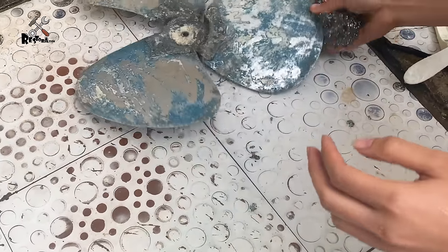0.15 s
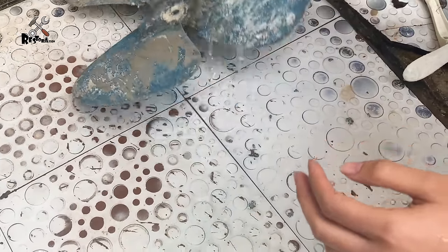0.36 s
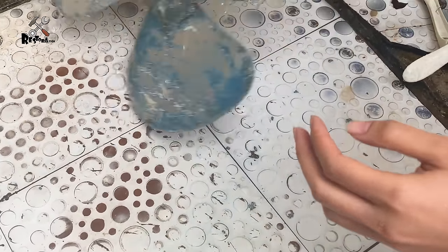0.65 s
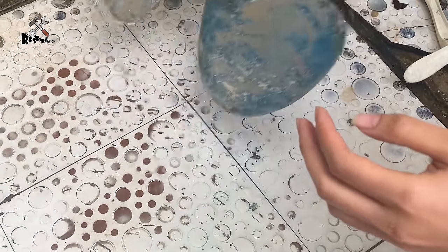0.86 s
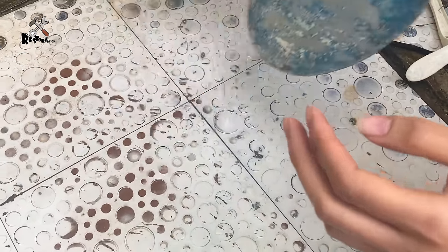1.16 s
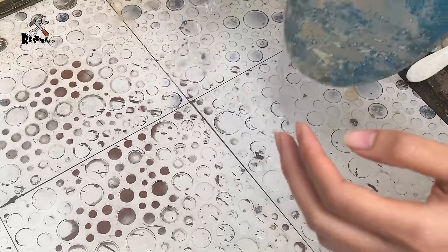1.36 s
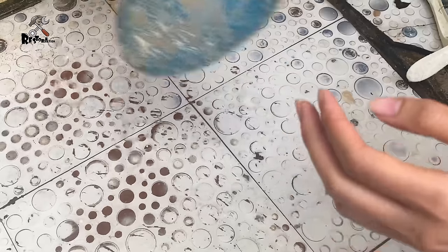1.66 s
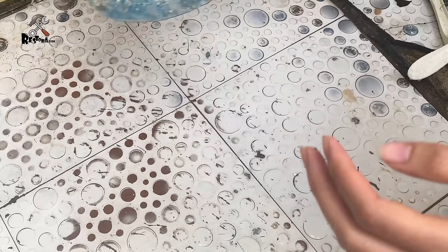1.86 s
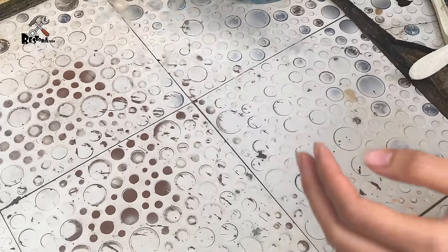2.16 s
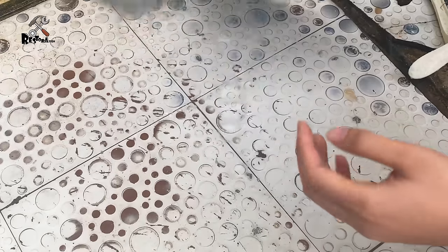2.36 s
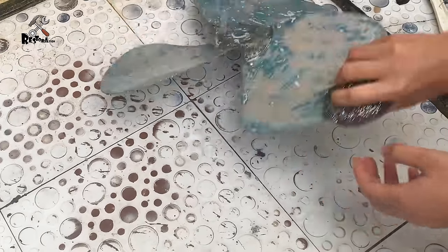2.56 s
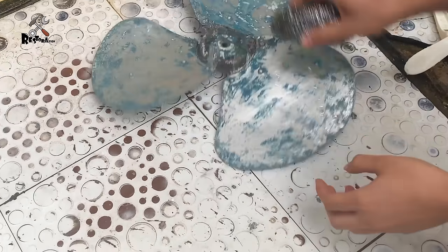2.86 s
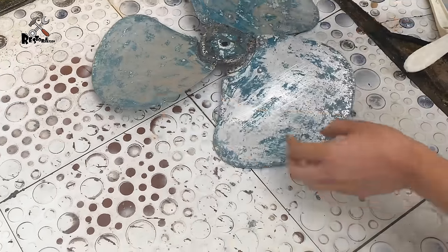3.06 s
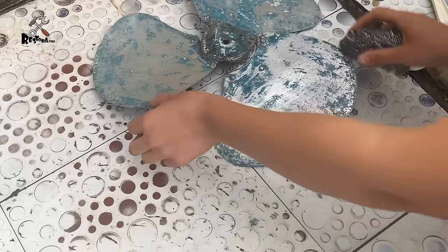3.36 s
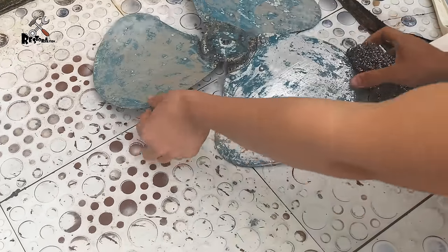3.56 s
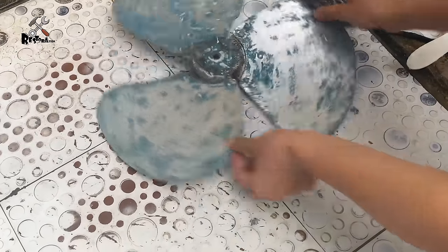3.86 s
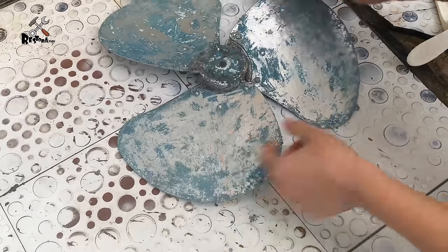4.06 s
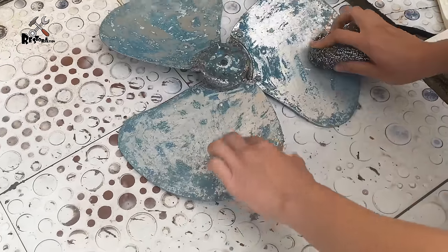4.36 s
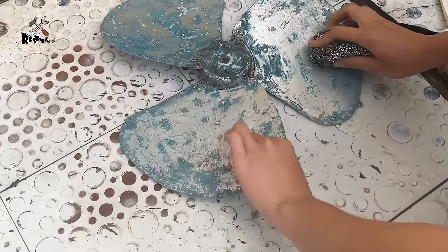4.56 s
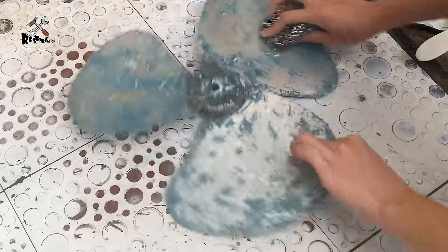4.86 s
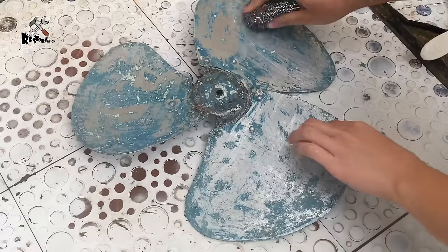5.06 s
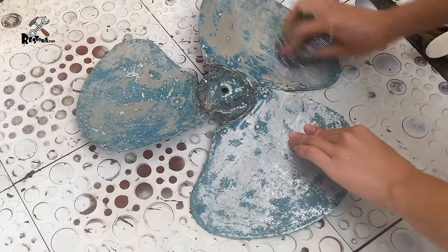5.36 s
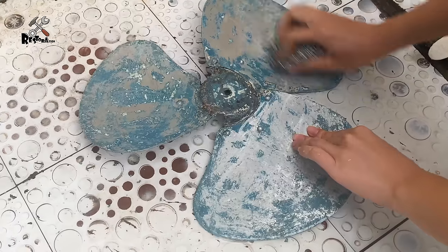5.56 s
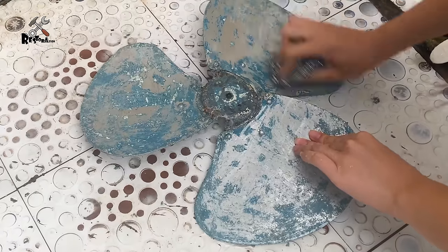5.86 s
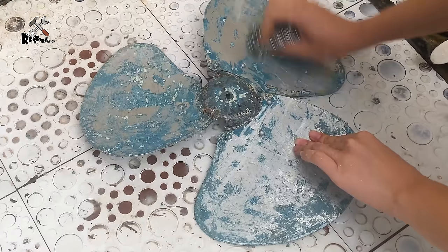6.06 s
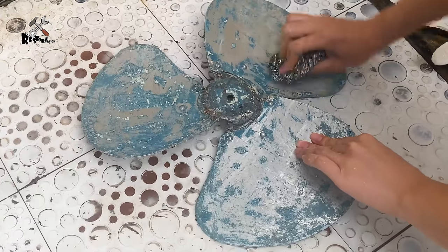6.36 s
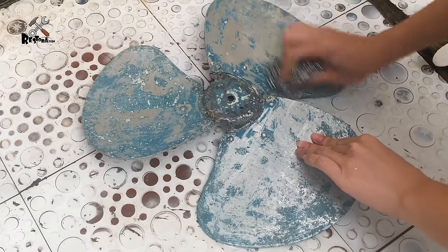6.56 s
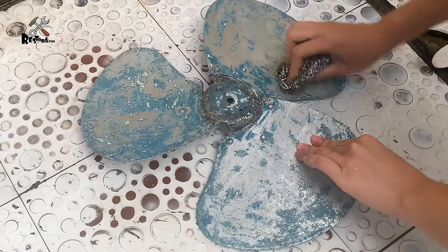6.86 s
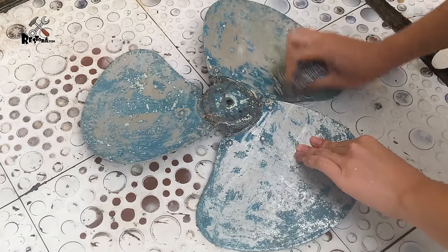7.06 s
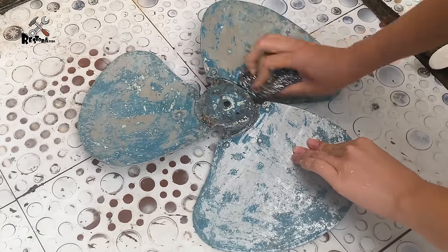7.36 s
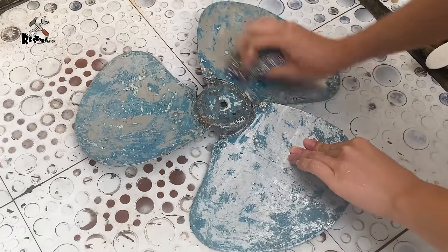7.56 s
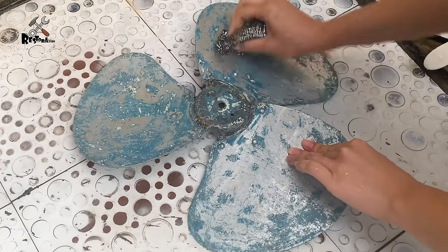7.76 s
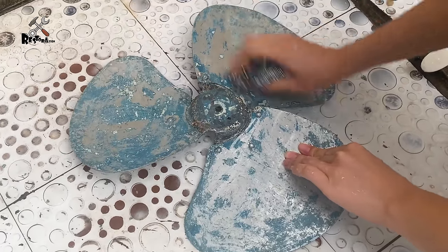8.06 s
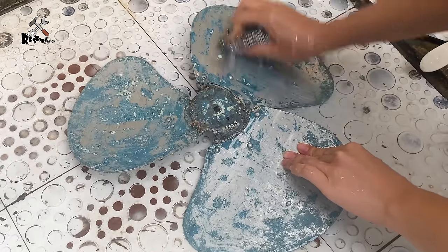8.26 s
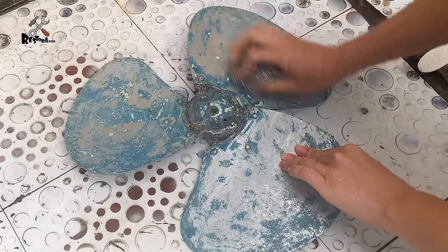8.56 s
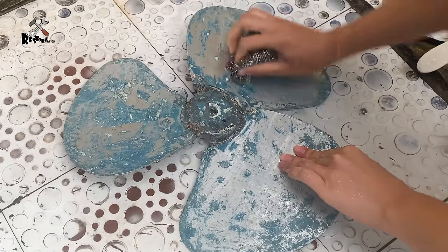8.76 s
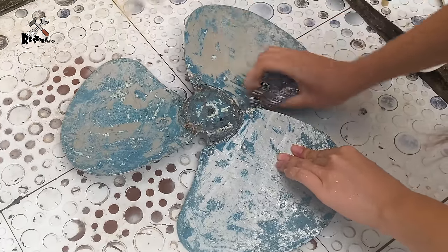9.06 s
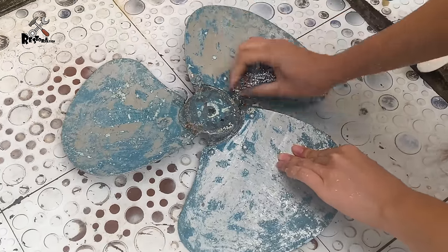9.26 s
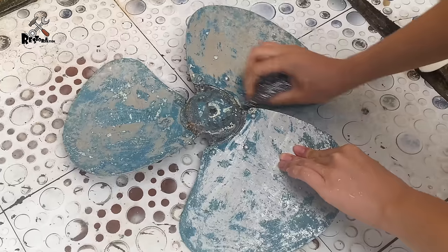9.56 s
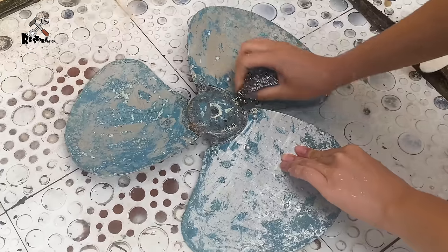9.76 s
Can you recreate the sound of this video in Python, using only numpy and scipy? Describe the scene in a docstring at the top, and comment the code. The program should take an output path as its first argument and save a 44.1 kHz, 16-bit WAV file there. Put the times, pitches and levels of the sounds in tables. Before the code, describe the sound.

Metal fan clanks and drags on a tiled floor, then wiry scouring strokes continue in a bright, fast, scratchy rhythm.

```python
"""Tiled floor: a steel-wool pad scours a three-bladed metal fan in quick to-and-fro strokes.
Filtered grains make the wires rasp; snap bursts make them snag; a broad resonance hums for the held blade.
In the first five seconds the fan knocks on the tiles and drags over them: decaying modes clang,
stick-slip grains scrape. Behind: steady air, dull rumbles, soft bumps and faint wavering tones."""
import sys
import numpy as np
from scipy import signal
from scipy.fft import rfft, irfft, next_fast_len
from scipy.io import wavfile
from scipy.ndimage import uniform_filter1d

SR = 44100
rng = np.random.default_rng(int(sys.argv[2]) if len(sys.argv) > 2 else 0)


def materialize(psi):
    """Save the field psi as 16-bit PCM at rate SR to the path in sys.argv[1].

    A 1-D psi becomes a single channel; in a 2-D psi each row is a channel.
    """
    bounded = np.clip(np.atleast_2d(psi).T, -1, 1)
    quanta = np.round(bounded * 32767).astype(np.int16)
    wavfile.write(sys.argv[1], SR, quanta)


N = 437031
TIME = np.arange(N) / SR
SIZE = next_fast_len(N + SR)
FREQS = np.arange(SIZE // 2 + 1) * SR / SIZE
SET_DOWN_S = 2.3   # fan held up before this; at most its rim touches the tiles


def from_db(db):
    """Decibels to gain."""
    return 10 ** (np.asarray(db) / 20)


def rms_one(x):
    """Scale to unit power."""
    return x / np.sqrt(np.mean(x ** 2) + 1e-20)


def level(rows):
    """Gain along (s, dB) rows, silent outside them."""
    s, db = np.transpose(rows)
    inside = (TIME >= s[0]) * (TIME <= s[-1])
    return from_db(np.interp(TIME, s, db)) * inside


def at_hz(points, hz):
    """Read a table on a log-frequency axis."""
    f, value = np.transpose(points)
    return np.interp(np.log(hz + 1), np.log(f), value)


def colour(x, spectrum):
    """Causal (minimum-phase) filter with the given (Hz, dB) spectrum."""
    size = next_fast_len(len(x) + 2048, True) // 2 * 2
    hz = np.arange(size // 2 + 1) * SR / size
    cepstrum = irfft(np.log(from_db(at_hz(spectrum, hz))))
    # fold the cepstrum onto positive time
    cepstrum[1:size // 2] *= 2
    cepstrum[size // 2 + 1:] = 0
    return irfft(rfft(x, size) * np.exp(rfft(cepstrum)))[:len(x)]


def band(x, hz, kind):
    """Butterworth filter of design order 2."""
    return signal.sosfilt(signal.butter(2, hz, kind, fs=SR, output="sos"), x)


def resonate(x, hz, width_hz):
    """One two-pole resonance, about unit gain on top."""
    r = np.exp(-np.pi * width_hz / SR)
    zeros = np.array([1, 0, -1]) * (1 - r * r) / 2
    poles = [1, -2 * r * np.cos(2 * np.pi * hz / SR), r * r]
    return signal.lfilter(zeros, poles, x + 1e-18)


def drift(per_s):
    """Random values, per_s of them a second, joined by straight lines."""
    return np.interp(TIME * per_s, np.arange(20000), rng.standard_normal(20000))


def grains(per_s, spread_db):
    """Random clicks, many small and a few large."""
    size_db = spread_db * np.minimum(rng.exponential(1, N), 5)
    sizes = from_db(size_db) * rng.choice([-1, 1], N)
    return sizes * (rng.random(N) < per_s / SR)


def steady(x, span_s):
    """Even out the slow level, keep the fine grain."""
    power = np.abs(uniform_filter1d(x ** 2, int(span_s * SR)))
    return x / np.sqrt(power + 1e-6 * np.mean(x ** 2))


def add(out, s, sound):
    """Mix a sound in at a time."""
    at = max(round(s * SR), 0)
    out[at:at + len(sound)] += sound[:N - at]


def dying(t60, count):
    """Noise that dies away, with unit energy."""
    tail = rng.standard_normal(count) * from_db(-60 * TIME[:count] / t60)
    return tail / np.sqrt(np.sum(tail ** 2))


# even-paced stroke runs, each until the next; negative stall lifts the turns:
# start_s, strokes_per_s, relative_level_db, stall_db
STROKE_RUNS = [(0.01, 8.2, -31.5, 3.5), (0.985, 6.6, -37.5, 1), (2.19, 8.0, -34, -0.5),
               (3.56, 7.9, -32.5, -1), (3.94, 7.7, -33, 4), (4.72, 4.5, -32, 2), (4.942, 10, -32.5, 2),
               (5.335, 6.8, -31.5, 3), (5.92, 8.7, -29, 7), (6.148, 8.2, -28, 4.5),
               (7.128, 7.6, -29.5, 3.5), (7.785, 8.2, -29.5, 4), (8.519, 10.2, -29, 4.5),
               (9.01, 7.8, -30.5, 4)]
STALL_SHARPNESS = 1.45   # higher: shorter halt at a turn
STROKE_SAG_DB = 0.5   # push eases from +this to -this along a stroke
STROKE_SPREAD_DB = 1.02   # stroke-to-stroke firmness


def pad_speed():
    """Rubbing gain: shaped by half-sine travel from turn to turn, whole strokes per run."""
    s, per_s, db, stall_db = np.transpose(STROKE_RUNS)
    bounds = np.append(s, TIME[-1])
    done = np.append(0, np.cumsum(np.round(per_s * np.diff(bounds))))
    stroke, part = np.divmod(np.interp(TIME, bounds, done), 1)
    travel = np.clip(np.sin(np.pi * part), 0, 1)
    run = np.maximum(np.searchsorted(s, TIME) - 1, 0)
    firmness_db = STROKE_SPREAD_DB * rng.standard_normal(200)[stroke.astype(int)]
    push_db = travel * (firmness_db + STROKE_SAG_DB * (1 - 2 * part))
    turn_db = stall_db[run] * (1 - travel) ** STALL_SHARPNESS
    return from_db(np.interp(TIME, s, db) + push_db - turn_db)


# wire rasp spectrum: freq_hz, level_db
RASP_COLOUR = [(200, -39), (600, -8), (1500, -2), (2300, -5.5), (3300, 2.5), (5000, 2), (7000, 2.5),
               (8600, 1.5), (11000, -1.5), (13000, -6), (16000, -16)]
# wires that catch and spring free at set times: time_s, relative_peak_db, pitch_hz
TIMED_SNAGS = [(0.047, -18, 11500), (0.402, -22, 4240), (0.9053, -26, 6640), (1.2396, -26.5, 9600),
               (1.436, -22.5, 4800), (1.766, -24, 4840), (2.358, -14.5, 10420), (3.191, -21, 6340),
               (3.3542, -21, 3450), (3.675, -23, 4640), (4.003, -18, 4200), (4.143, -21, 7100),
               (4.481, -19, 4430), (4.6565, -18, 9800), (5.5877, -17.5, 4900), (5.9569, -18.5, 5700),
               (6.6313, -18.5, 6000), (7.166, -18, 6100), (7.405, -23, 2950), (8.7554, -19.5, 9810),
               (9.0726, -19.5, 4900), (9.5806, -21, 5800)]


def rasp(speed):
    """Thousands of wire tips slip over the paint; each length band catches in its own clumps."""
    edges_hz = np.geomspace(1200, 17000, num=8)
    clumps = [from_db(3.44 * drift(per_s=39) + 3.84 * drift(per_s=200)) for edge in edges_hz[1:]]
    clumps[-1] = clumps[-1] * (speed / from_db(-45.0)) ** 0.45   # faster pad: brighter
    grip = from_db(0.47 * drift(per_s=120))
    catches = np.clip(grains(per_s=240, spread_db=3.4), -4.5, 4.5)

    def radiate():
        """Same clumps and catches, fresh fine detail for one draw."""
        wires = band(grains(per_s=10000, spread_db=2.0), edges_hz[0], "low")
        for low, high, clump in zip(edges_hz, edges_hz[1:], clumps):
            wires += clump * band(grains(per_s=14000, spread_db=3.5), [low, high], "band")
        crackle = rms_one(signal.oaconvolve(catches, dying(0.0011, count=SR // 50))[:N])
        contacts = grip * rms_one(wires) + from_db(-4.5) * crackle
        return from_db(-2.5) * speed * rms_one(colour(contacts, RASP_COLOUR))

    caught = np.vstack([TIMED_SNAGS, random_snags(speed)])
    return np.array([radiate() + snags(caught) for draw in range(3)])


RANDOM_SNAGS_PER_S = 7
WIRE_LOW_HZ, WIRE_HIGH_HZ = 3440, 11600
RANDOM_SNAG_DB, RANDOM_SNAG_SPREAD_DB = -26, 5   # relative peak at median pad speed; spread either way
RANDOM_SNAG_FOLLOWS = 0.27   # share of the pad's level swing


def random_snags(speed):
    """Further snags at random times, stronger at high pad speed: time_s, relative_peak_db, pitch_hz."""
    count = int(RANDOM_SNAGS_PER_S * TIME[-1])
    when, size, length = rng.random((count, 3)).T
    s = (np.arange(count) + when) / RANDOM_SNAGS_PER_S
    speed_db = 20 * np.log10(np.interp(s, TIME, speed) / np.median(speed))
    db = RANDOM_SNAG_DB + RANDOM_SNAG_FOLLOWS * speed_db + RANDOM_SNAG_SPREAD_DB * (2 * size - 1)
    pitch_hz = WIRE_LOW_HZ * (WIRE_HIGH_HZ / WIRE_LOW_HZ) ** length
    return np.column_stack([s, db, pitch_hz])


# snapping wire spectrum: freq_hz, level_db
SNAG_COLOUR = [(300, -46), (1200, -28), (2200, -23), (3300, 6.5), (6000, 2), (8500, -4), (11500, -2),
               (16000, -29)]
SNAP_T60_S, RATTLE_T60_S = 0.014, 0.056


def snags(rows):
    """A caught wire snaps free, rings at its own pitch and rattles against its neighbours."""
    out = np.zeros(N)
    for s, db, hz in rows:
        crack = dying(SNAP_T60_S, count=SR // 10)
        burst = crack + from_db(5.0) * dying(RATTLE_T60_S, count=SR // 10)
        snap = 0.18 * colour(burst, SNAG_COLOUR)
        snap = snap + resonate(snap, hz, .5 * hz)
        add(out, s, from_db(db + 4.0) * snap / np.abs(snap).max())
    return out


# pad drives the held blade: start_s, end_s, relative_start_db, relative_end_db
HUM_BOUTS = [(3.21, 3.66, -46.5, -52), (4.05, 4.66, -49.5, -45), (5.003, 9.913, -51, -45)]
HUM_UNEVEN_DB = 1.5   # uneven bearing of the pad on the blade


def blade_hum(speed):
    """Held blade: grains through a broad resonance, throbbing with the strokes."""
    hum = resonate(resonate(grains(per_s=600, spread_db=3.5), 1162, 155), 1002, 405)
    pressure = sum(level([(start, start_db), (end, end_db)])
                   for start, end, start_db, end_db in HUM_BOUTS)
    uneven = from_db(3.0 + HUM_UNEVEN_DB * drift(per_s=13))
    throb = steady(speed, span_s=0.32) ** 1.05
    return uneven * pressure * throb * steady(hum, span_s=0.34)


# main fan modes: nominal_pitch_hz, relative_level_db, nominal_t60_s
FAN_MODES = [(197, -7.5, 0.32), (247.6, -3, 0.29), (278, -10.5, 0.057), (450, -2.5, 0.35), (524, 6, 0.12),
             (736, 0, 0.22), (821, -1, 0.36), (910, 3, 0.2), (907, -4, 0.39), (1006, 2, 0.25),
             (1090, 5.5, 0.22), (1116, 1.5, 0.31), (1227, 3.5, 0.12), (1282, -4, 0.097), (1356, 0, 0.21),
             (1446, 5, 0.15), (1613, 6, 0.17), (1730, -18, 0.15), (1884, 1.5, 0.13), (2050, -25, .12),
             (2320, -10.5, 0.38), (2880, -2.5, 0.27)]
# spectrum of the many short overtones: freq_hz, level_db
CLANG_COLOUR = [(60, -65.5), (200, -9), (550, -4), (850, 0), (1150, -19.5), (1450, -11), (2100, -10.5),
                (4000, -11.5), (7000, -25.5), (16000, -16.5)]
FAVOUR_DB, FAVOUR_WIDTH_HZ = 9.5, 42   # lift of modes near the favoured pitch


def fan_ring(damping, clang_db, clang_t60, spread_db, favoured_hz=0):
    """Fan's answer to one touch: decaying modes, weighted by the spot, plus dying clang noise."""
    t = TIME[:SR // 3]
    hz, db, t60 = np.transpose(FAN_MODES)[:, :, None]
    db = db + FAVOUR_DB * np.exp(-((hz - favoured_hz) / FAVOUR_WIDTH_HZ) ** 2)
    hz = hz * (1 + 0.0065 * rng.standard_normal(hz.shape))   # blades not quite alike
    strength = from_db(db + spread_db * rng.standard_normal(hz.shape)) * rng.choice([-1, 1], hz.shape)
    decay = from_db(-60 * damping * t / t60)
    modes = np.sum(strength * np.sin(2 * np.pi * hz * t) * decay, axis=0)
    clang = rms_one(colour(dying(clang_t60, count=len(t)), CLANG_COLOUR))
    return rms_one(modes) + from_db(clang_db) * clang


# fan knocks on the tiles, levels relative:
# time_s, peak_db, weight_db, hardness_db, rebound_delay_s, favoured_pitch_hz
BLOWS = [(0.563, -28.5, -6.5, -23, 0.011, 815), (1.799, -6, -6.5, -19.5, 0.014, 1356),
         (2.383, -6.5, -4, -10, 0.026, 804), (2.447, -6, -16, -14, 0.007, 890),
         (2.479, -12.5, -7.5, -4.5, 0.012, 1613), (2.746, -15, -10.5, -10.5, 0.008, 920),
         (2.849, -11, -15, -17, 0.015, 1093), (2.891, -11.5, -13, -10.5, 0.01, 1010),
         (2.993, -14, -13, -17.5, 0.053, 1010), (3.126, -18, -16, -23, 0.01, 1446),
         (3.914, -14.5, -23, -36, 0.007, 1220), (4.145, -25, -35, -3.5, 0.008, 1220),
         (4.766, -13, -14.5, -13.5, 0.065, 1200), (4.899, -16.5, -22, -18.5, 0.017, 1290)]
REBOUND_DB, REBOUND_WEIGHT_DB, REBOUND_HARDNESS_DB = -1.5, -3.5, -14.5   # against the first touch


def touches():
    """Each knock lands twice, second softer: time_s, peak_db, weight_db, hardness_db, favoured_hz."""
    for s, db, weight_db, hardness_db, rebound_s, hz in BLOWS:
        yield s, db, weight_db, hardness_db, hz
        yield (s + rebound_s, db + REBOUND_DB, weight_db + REBOUND_WEIGHT_DB,
               hardness_db + REBOUND_HARDNESS_DB, hz)


def knocks():
    """Blow on the fan: short clack first; weight wakes the low modes, hardness the top."""
    out = np.zeros(N)
    for s, db, weight_db, hardness_db, favoured_hz in touches():
        damping = .9 if s < SET_DOWN_S else 1.05   # floor shortens the ring
        ring = fan_ring(damping, clang_db=-1.5, clang_t60=0.093, spread_db=4.0, favoured_hz=favoured_hz)
        ring += from_db(-12.0) * rms_one(colour(dying(0.029, count=len(ring)), CLANG_COLOUR))   # clack
        body = rms_one(band(ring, [620, 1900], "band"))
        low_noise = rms_one(band(dying(0.018, count=len(ring)), [85, 220], "band"))
        thud = rms_one(band(ring, [170, 560], "band")) + from_db(-17.5) * low_noise
        crack = rms_one(band(band(ring, 5800, "high"), [2000, 11000], "band"))
        blow = body + from_db(weight_db + 3.0) * thud + from_db(hardness_db + 3.5) * crack
        add(out, s, from_db(db + 1.5) * blow / np.abs(body).max())
    return out


# fan shoved over the tiles, levels relative:
# start_s, fastest_s, stop_s, main_resonance_db, rattle_db
SHOVES = [(-0.05, 0.004, 0.36, -38.5, -37), (0.425, 0.487, 0.63, -39, -35.5),
          (2.44, 2.49, 2.58, -26, -26.5), (2.545, 2.757, 2.79, -25.5, -33),
          (2.823, 2.878, 2.956, -15.5, -31), (2.897, 2.996, 3.11, -28, -33.5),
          (3.628, 3.885, 4.09, -19, -34.5), (4.64, 4.854, 4.96, -21.5, -32.5)]
RESONANCE_LAW, RATTLE_LAW = 1.42, 0.77   # exponents on sliding speed


def shoves():
    """Main-resonance and rattle gains as each shove speeds up and slows to a stop."""
    main, rattle = np.zeros((2, N))
    for start, fastest, stop, main_db, rattle_db in SHOVES:
        sliding = np.interp(TIME, [start, fastest, stop], [0, 1, 0])
        main += from_db(main_db) * sliding ** RESONANCE_LAW
        rattle += from_db(rattle_db) * sliding ** RATTLE_LAW
    return main, rattle


def drags(slips):
    """Rim sticks and slips on the tiles; slips drive the main resonance and rattle the other modes."""
    slips = slips * rng.choice([-1, 1], N)   # own signs in each draw
    main = resonate(resonate(slips, 1084, 170), 1265, 160)
    grit = resonate(band(slips, [1500, 3600], "band"), 1110, 1300)
    dust = band(slips, [2800, 5000], "band")   # crunches under the rim
    main = steady(main, span_s=0.04) + from_db(-7.5) * steady(grit, span_s=0.076)
    main += from_db(-16) * steady(dust, span_s=0.041)
    spot = (TIME * 11).astype(int) % 5   # touching spot travels along the rim
    rattle = np.zeros(N)
    for k in range(5):
        ring = fan_ring(damping=1.0, clang_db=-0.5, clang_t60=0.14, spread_db=2.0)
        rattle += signal.oaconvolve(slips * (spot == k), ring[:SR // 4])[:N]
    rattle = band(rattle, [240, 2300], "band") + .5 * resonate(rattle, 837, 100)
    rattle += 2.7 * (TIME < SET_DOWN_S) * resonate(rattle, 800, 33)   # held-up blades bend freely
    main_gain, rattle_gain = shoves()
    scrape = main_gain * main + from_db(4.5) * rattle_gain * steady(rattle, span_s=0.11)
    return scrape + 1.4 * resonate(scrape, 1119, 3.3)   # clearest mode sings on after the slips


def lift_off(s, hz, db, t60):
    """Rim leaves the tiles: the freed blade rings out on its clearest mode, a decaying sine."""
    age = np.maximum(TIME - s, 0)
    return from_db(db - 60 * np.minimum(age / t60, 3)) * np.sin(2 * np.pi * hz * age)


def swell_and_die(s, db, rise_s, t60):
    """Gain that rises to a peak at a time, then decays."""
    rise = np.clip(1 + (TIME - s) / rise_s, 0, 1)
    return rise * from_db(db - 60 * np.clip((TIME - s) / t60, 0, 2))


# dull rumbles: peak_s, relative_peak_db, rise_s, t60_s
RUMBLE_SWELLS = [(3.994, -42, 0.08, 1.2), (4.5, -43, 0.08, 1.3), (6.056, -36.5, 0.019, 0.83)]
# rumble spectrum: freq_hz, level_db
RUMBLE_COLOUR = [(60, -21), (130, -21), (180, -3.5), (255, -9.5), (330, -19), (700, -28.5)]
# soft handling bumps: centre_s, pitch_hz, level_db, half_length_s
SOFT_BUMPS = [(3.103, 65, -48, .07), (3.217, 49.7, -43, 0.095), (5.441, 474, -45.5, 0.036),
              (5.565, 404, -51, 0.062), (6.903, 430, -49, 0.078), (7.489, 436, -47.5, 0.073),
              (7.658, 415, -48, 0.031), (8.507, 424, -52, 0.077), (9.154, 453, -45.5, 0.045)]


def low_sounds():
    """Rumbles: coloured noise that swells and dies; bumps: resonant noise under a Hann swell."""
    noise = steady(colour(rng.standard_normal(N), RUMBLE_COLOUR), span_s=0.069)
    out = from_db(2.5) * sum(swell_and_die(*one) for one in RUMBLE_SWELLS) * noise
    for s, hz, db, length in SOFT_BUMPS:
        swell = np.hanning(int(2 * length * SR))
        bump = resonate(resonate(rng.standard_normal(SR), hz, .45 * hz), hz, 0.58 * hz)[-len(swell):]
        add(out, s - length, from_db(db) * swell * rms_one(bump))
    return out


# steady air spectrum: freq_hz, level_db
AIR_COLOUR = [(20, -39), (35, -18), (55, 3.5), (75, 0.5), (110, -9.5), (200, -12.5), (400, -13),
              (650, -5.5), (1000, -15), (2700, -10.5), (6000, -44), (16000, -60)]
# faint wavering tones: start_s, end_s, pitch_hz, relative_level_db, wander_share_of_pitch
WAVERING_TONES = [(.5, 2.6, 634, -57.5, 0.12), (.8, 2.8, 2850, -49.5, 0.072), (4.2, 9.9, 600, -68, .1)]


def background():
    """Coloured-noise air, low sounds and sines that wander in pitch and level."""
    out = from_db(-49.5) * rms_one(colour(rng.standard_normal(N), AIR_COLOUR)) + low_sounds()
    for start, end, hz, db, wander in WAVERING_TONES:
        phase = 2 * np.pi * np.cumsum(hz * (1 + wander * drift(per_s=14))) / SR
        fade = np.clip(np.minimum(TIME - start, end - TIME) / 0.31, 0, 1)
        out += from_db(db) * fade * rms_one(drift(per_s=0.15 * hz) * np.sin(phase))
    return out


# power share common to both channels: freq_hz, share_0_to_1
COMMON_SHARE = [(100, 1), (450, 0.86), (750, 0.26), (1170, 0.94), (1700, 0.14), (2400, 0.78), (4200, 0.34),
                (7400, 0.51), (8200, 0.83), (13500, 1), (16000, 0.6)]
# phase by which left leads: freq_hz, lead_rad
LEFT_LEAD = [(0, 0), (400, -.2), (720, .8), (1200, .3), (1700, -.6), (3400, 1.3), (5200, 1), (5800, -1.6),
             (6800, -.7), (7600, -1.7), (8100, -3.1), (10800, -6.2), (13400, -9.4), (16000, -12.9)]


def to_stereo(draws, room_db, room_t60, pan_db):
    """First draw feeds both channels with a phase lead; the others feed one each, as diffuse sound."""
    share = np.clip(at_hz(COMMON_SHARE, FREQS), 0, 1)
    sides = np.array([[1], [-1]])
    lead_rad = np.interp(FREQS, *np.transpose(LEFT_LEAD))
    common = np.sqrt(share) * np.exp(.5j * sides * lead_rad)
    room = from_db(room_db) * rfft([dying(room_t60, count=SR // 2) for side in sides], SIZE)
    spectra = rfft(draws, SIZE)
    channels = spectra[0] * (common + room) + np.sqrt(1 - share) * spectra[1:]
    return irfft(channels, SIZE)[:, :N] * from_db(sides * pan_db / 2)


def scene():
    """Pad, fan and background, three draws of each, mixed in stereo."""
    speed = pad_speed()
    slips = grains(per_s=1700, spread_db=2.2)
    fan = [blade_hum(speed) + drags(slips) + knocks() for draw in range(3)]
    fan[0] += lift_off(s=.566, hz=1123, db=-34, t60=0.56)
    air = [background() for draw in range(3)]
    return (to_stereo(rasp(speed), room_db=-11, room_t60=0.077, pan_db=1.5)
            + to_stereo(fan, room_db=-10, room_t60=0.23, pan_db=1.5)
            + to_stereo(air, room_db=-8.5, room_t60=0.52, pan_db=-2.5))


CUTOFF_HZ = 15900


def record(dry):
    """Round the peaks (tanh), then cut the top steeply."""
    top_cut = 1 / (1 + (FREQS / CUTOFF_HZ) ** 200)
    return irfft(rfft(np.tanh(dry), SIZE) * top_cut, SIZE)[:, :N]


dry = scene()
out = record(dry)
materialize(out)
```